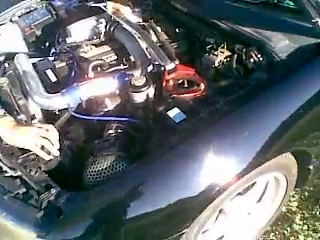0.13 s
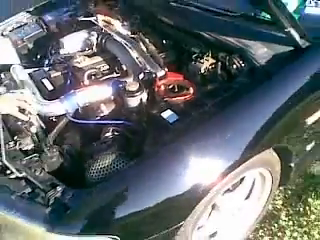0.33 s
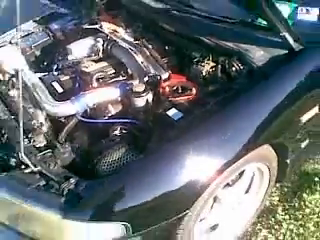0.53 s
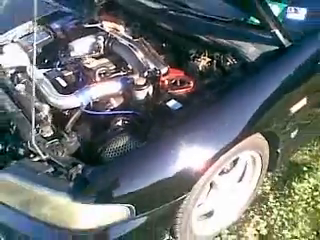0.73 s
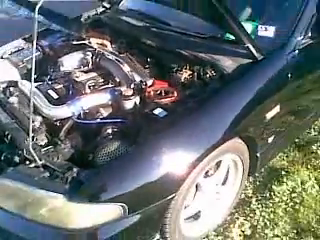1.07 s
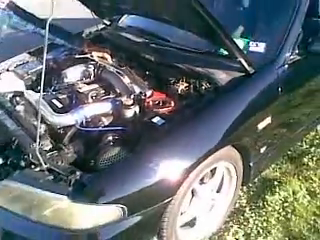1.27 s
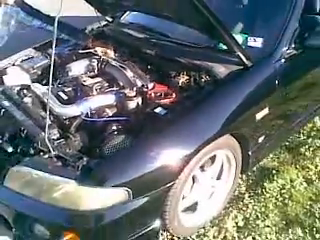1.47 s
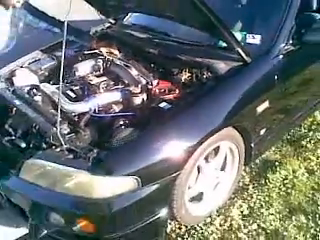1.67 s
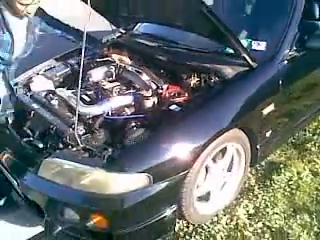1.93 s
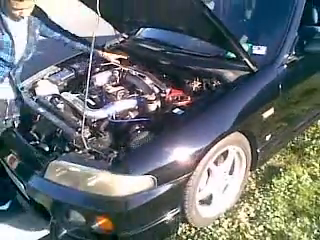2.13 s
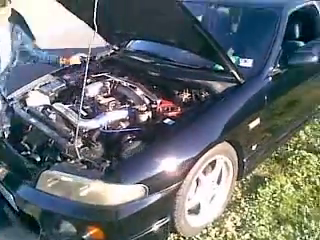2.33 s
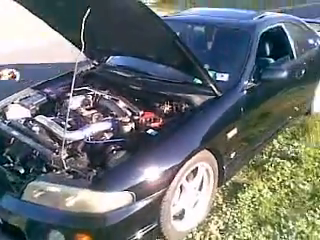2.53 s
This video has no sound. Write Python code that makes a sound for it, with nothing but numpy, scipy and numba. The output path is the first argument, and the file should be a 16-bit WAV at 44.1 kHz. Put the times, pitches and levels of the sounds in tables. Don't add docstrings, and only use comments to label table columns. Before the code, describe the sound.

A six-cylinder turbo engine drops, gets a quick throttle blip, then chuffs in a fading flutter

```python
import sys
import numpy as np
from scipy import signal
from scipy.fft import dct
from scipy.io import wavfile
from scipy.ndimage import uniform_filter1d
from numba import njit

SR = 44100
rng = np.random.default_rng(int(sys.argv[2]) if len(sys.argv) > 2 else 0)


def ratio(d):
    e = np.asarray(d, float) / 20
    return 10 ** e


def transcribe(u):
    v = np.clip(np.atleast_2d(u).T, -1, 1)
    q = np.round(v * 32767).astype(np.int16)
    wavfile.write(sys.argv[1], SR, q)


N = 119511

# time in seconds, firing rate in Hz, level of the firing tone in dB,
# level of the half-rate tone in dB, level of the exhaust overtones in dB.
ENGINE = [(0,154.1,-29,-48,-31.5), (0.06,149.5,-30,-37,-32.5), (0.24,137.3,-21.5,-34.5,-33.5),
          (0.41,126.5,-21.5,-43.5,-35), (0.67,108,-18.5,-42,-39), (0.77,100.6,-20,-30.5,-35.5),
          (0.88,96.86,-22,-35,-37), (1.0,114.5,-17.5,-47,-37), (1.14,142.8,-21,-45,-36),
          (1.23,165.6,-22.5,-61,-39), (1.33,186.9,-23,-36.5,-36), (1.42,203,-17,-63,-31.5),
          (1.49,215.4,-22.5,-32,-51), (1.54,210.1,-27,-29.5,-49), (1.71,197,-24,-27.5,-35.5),
          (2.08,164.1,-27.5,-33,-37), (2.45,136.4,-20,-36,-34), (2.71,118,-24.5,-48,-37.5)]
# multiple of the cycle rate, level in dB re the half-rate tone.
UNEVEN_TONES = [(2, -27.5), (3, -1), (4, -6.5), (5, -14.5)]
# multiple of the cycle rate, level in dB re all overtones.
OVERTONES = [(7, -14), (8, -13), (9, -6), (10, -12), (12, -10), (15, -11), (18, -14), (21, -20)]
# centre in Hz, width in Hz, level in dB.
PIPES = [(202.4, 54, -1.5), (297, 90, -1.5), (367, 130, -2.5)]
# time in seconds, length in seconds, depth in dB.
STUMBLES = [
    (.133, .007, 5),
    (.755, .013, 20),
    (.845, .01, 6),
    (1.243, .011, 11),
    (1.505, .016, 12),
]
# time in seconds, pitch in Hz, level in dB, length in seconds.
THUDS = [(.06, 76, -15.5, 0.011), (0.103, 88, -15.5, 0.01), (0.81, 61.4, -33, 0.01), (1.7, 46, -32, 0.011),
         (1.5, 79.8, -23, .009), (.027, 385, -21.5, 0.0099), (1.548, 335, -25, 0.022),
         (1.1, 310, -29, 0.025), (0.92, 357, -26.5, 0.0077), (0.28, 360, -36, 0.018),
         (0.33, 190, -31, 0.019)]
# time in seconds, pitch in Hz, level in dB, length in seconds.
DUCT_RINGS = [(1.44, 1070, -22, 0.0074), (1.458, 1100, -23.5, 0.008), (1.46, 2150, -24, 0.0057),
              (1.467, 2180, -19, 0.0057), (1.527, 1040, -17, 0.0055), (1.548, 705, -17.5, 0.0079),
              (1.566, 720, -21.5, 0.0096), (1.564, 1200, -24, 0.017), (1.598, 1044, -19, .006),
              (1.2, 1050, -38, 0.015), (.03, 930, -30.5, 0.015), (.035, 790, -30.5, 0.013),
              (.285, 790, -33.5, .02), (1.73, 1700, -28, 0.019)]
# time of the crest in seconds, rise in seconds, fall in seconds,
# multiple of the cycle rate, level in dB.
GROWL = [
    (0.95, 0.08, 0.028, 12, -28.5),
    (1.296, 0.054, 0.044, 9, -33),
    (1.055, 0.055, 0.026, 18, -38),
    (1.055, 0.019, 0.032, 24, -44.5),
    (1.28, 0.047, 0.029, 18, -47.5),
    (1.36, 0.044, 0.03, 12, -31.5),
    (1.133, 0.05, .03, 12, -35),
    (0.78, 0.077, .05, 12, -34),
    (1.11, 0.049, 0.048, 9, -35),
]
# time in seconds, level in dB.
AIRFLOW = [(0, -28.5), (.3, -34.5), (.6, -39), (.87, -43.5), (1.03, -37.5), (1.15, -35.5), (1.3, -30),
           (1.4, -29), (1.6, -22), (1.8, -28.5), (2.1, -33.5), (2.4, -37.5), (2.71, -45)]
# centre in Hz, width in Hz, level in dB.
DUCTS = [(345, 98, -0.5), (671, 52, -2.5), (780.5, 64, -1.5), (865, 58, -3), (1025, 78, 0.5),
         (1253, 110, -3.5), (1418, 100, -1.5), (1666, 100, -5.5), (1862, 170, -0.5), (2181, 110, 1),
         (2410, 130, -4.5), (3017, 350, -6), (3804, 350, -5), (4770, 320, -11.5)]
# time of the crest in seconds, level in dB,
# rise in seconds, fall in seconds, pitch of the ringing duct in Hz.
SURGES = [
    (1.461, -20, 0.035, 0.013, 2220),
    (1.546, -20, 0.0081, 0.036, 710),
    (1.657, -25.5, 0.013, 0.011, 1040),
]
# time of the crest in seconds, level of the jet in dB,
# centre of the jet in Hz, level of the duct roar in dB.
PUFFS = [(0.03, -27, 6220, -30), (0.109, -31, 5640, -30), (0.187, -31.5, 5290, -35),
         (0.263, -34, 5740, -34.5), (0.341, -35.5, 5380, -34.5), (0.421, -37.5, 5680, -34),
         (0.496, -39, 6130, -34), (0.565, -42, 6140, -36), (0.641, -44, 6300, -39),
         (1.413, -27, 5330, -26.5), (1.469, -25, 5880, -17), (1.533, -25, 5500, -19),
         (1.646, -35, 6580, -41), (1.684, -29, 7050, -46), (1.755, -28, 7860, -25),
         (1.845, -25, 7410, -27.5), (1.931, -25, 6900, -31.5), (2.015, -26, 5740, -31),
         (2.094, -31.5, 5260, -36), (2.171, -31, 5190, -35), (2.246, -32, 5160, -47),
         (2.324, -34, 5050, -37.5), (2.402, -35.5, 5070, -38), (2.474, -39, 5120, -40.5),
         (2.555, -40, 5320, -39), (2.629, -41, 5200, -40.5), (2.71, -40.5, 5270, -38.5)]
# time in seconds, level in dB.
BOOST = [(0, -52.5), (.4, -47), (.75, -58.5), (.95, -54.5), (1.12, -48.5), (1.3, -33.5), (1.45, -31.5),
         (1.62, -30), (1.82, -42.5), (2.2, -52), (2.71, -51.5)]
# time in seconds, level in dB.
SNAPS = [
    (0.018, -38),
    (1.828, -28.5),
    (2.001, -38),
]
# frequency in Hz, level in dB per Hz.
BAY = [(15, -47), (25, -18), (102, -11), (213, -5.5), (530, -44.5), (767, -33.5), (2270, -23.5),
       (7210, -49), (9000, -108), (11700, -138), (19800, -120)]
# centre in Hz, width in Hz, share cancelled (0 to 1).
ECHO_VALLEYS = [(529, 170, 0.42), (1442, 160, 0.27), (3236, 590, 0.14), (4386, 150, 0.69), (5440, 89, 0.88),
                (6690, 190, 0.37)]
# frequency in Hz, step in dB re the neighbouring level,
# smallest step in dB.
STEPS = [(100, -28, -80), (2300, -8, -70), (3200, 2, -60), (4200, 7, -56), (7800, 8, -51), (8200, 12, -45),
         (8900, 13, -41), (10000, 14.5, -36)]
# time in seconds, length in seconds.
COARSER_MOMENTS = [
    (1.87, .025),
    (1.96, .035),
    (2.03, .012),
]


def level(x, db):
    return x * ratio(db) / np.sqrt(np.mean(x ** 2))


def noise():
    return rng.standard_normal(N)


@njit
def moving_band(x, hz, width):
    y, band_state, low_state = np.empty(len(x)), 0., 0.
    for i in range(len(x)):
        g, damping = np.tan(np.pi * hz[i] / SR), width / hz[i]
        v = (band_state + g * (x[i] - low_state)) / (1 + g * (g + damping))
        band_state, low_state = 2 * v - band_state, low_state + 2 * g * v
        y[i] = damping * v
    return y


def band(x, hz, width_hz):
    return moving_band(x, hz * np.ones(N), 1. * width_hz)


def walk(rate_hz):
    hold = int(SR / rate_hz)
    held = np.repeat(rng.standard_normal(N // hold + 1), hold)
    return 1.73 * uniform_filter1d(uniform_filter1d(held, hold), hold)[:N]


def curve(table, axis):
    rows = np.array(table, float)
    return np.interp(np.arange(N) / SR, rows[:, 0], rows[:, axis])


def bump(at, rise, fall):
    d = np.arange(N) / SR - at
    return np.exp(-.5 * (d / np.where(d < 0, rise, fall)) ** 2)


def tones(cycle, orders, wobble_db, drift):
    total = 0
    for multiple, db in orders:
        loudness = ratio(db + wobble_db * walk(14)) * np.sqrt(2)
        phase = multiple * cycle + drift * walk(11) + rng.random()
        total = total + loudness * np.sin(2 * np.pi * phase)
    return total


def firing(cycle):
    stumble = ratio(-sum(db * bump(s, w, w) for s, w, db in STUMBLES))
    main = ratio(curve(ENGINE, axis=2)) * stumble * tones(cycle, [(6, 0.0053)], 1.0, 0.052)
    return main + ratio(curve(ENGINE, axis=3)) * tones(cycle, UNEVEN_TONES, 0.34, 0.17)


def exhaust(cycle):
    rumble = level(band(band(noise(), 340, 170), 340, 200), -7)
    rumble = rumble * (1 + .5 * np.sin(12 * np.pi * cycle))
    pulses = tones(cycle, OVERTONES, 2.96, 0.094)
    piped = sum(ratio(db) * band(pulses, hz, w) for hz, w, db in PIPES)
    return ratio(curve(ENGINE, axis=4)) * (piped + rumble)


def thuds():
    t = np.arange(N) / SR
    return sum(ratio(db) * bump(s, w, w) * np.cos(2 * np.pi * hz * (t - s))
               for s, hz, db, w in [*THUDS, *DUCT_RINGS])


def intake(cycle):
    gate = (1 + .2 * np.sin(12 * np.pi * cycle)) * ratio(0.57 * walk(25.13))
    ticks = np.diff(np.floor(12 * cycle), prepend=0) * ratio(4.0 * noise())
    air = gate * noise() + level(ticks, -9.5)
    ducts = 0
    for k, (hz, w, db) in enumerate(DUCTS):
        sign = (-1) ** k
        ducts = ducts + sign * ratio(db + 1.2 * walk(10)) * band(air, hz, w) / np.sqrt(w)
    power = ratio(curve(AIRFLOW, axis=1)) ** 2
    for s, _, _, db in PUFFS:
        power = power + (ratio(db) * bump(s, 0.015, 0.022)) ** 2
    for s, db, rise, fall, _ in SURGES:
        power = power + (ratio(db) * bump(s, rise, fall)) ** 2
    rings = sum(ratio(db) * bump(s, rise, fall) * level(band(noise(), hz, 89), -20.5)
                for s, db, rise, fall, hz in SURGES)
    return level(ducts, 0) * np.sqrt(power) + rings


def hiss_band(hz, width_hz):
    return level(band(band(noise(), hz, width_hz), hz, 1.1 * width_hz), 0)


def even(x):
    power = abs(uniform_filter1d(x ** 2, size=int(.006 * SR)))
    return x / np.sqrt(power + .05)


def surge_jets():
    puffs = sum(ratio(db) * bump(s, 0.0099, 0.013) for s, db, _, _ in PUFFS)
    jet = hiss_band(curve(PUFFS, axis=2), 2000)
    jet = jet + ratio(-5.5) * hiss_band(7350, 1900) + ratio(-9) * hiss_band(4900, 1500)
    snaps = sum(ratio(db) * bump(s, .001, .012) for s, db in SNAPS) * even(hiss_band(7700, 2200))
    return puffs * ratio(.8 * walk(120)) * even(jet) + snaps


def bay():
    hzs, dbs = np.array(BAY, float).T
    total = 0
    for hz in 28 * 2 ** np.arange(0, 8.3, .5):
        db = np.interp(np.log(hz), np.log(hzs), dbs) + 1.2 * walk(13)
        total = total + ratio(db) * band(band(noise(), hz, hz / 2), hz, hz / 2)
    return level(total, -36.5)


def growl(cycle):
    return sum(bump(s, rise, fall) * tones(cycle, [(round(k), db)], 1.3, 0.08)
               for s, rise, fall, k, db in GROWL)


def boost():
    hiss = hiss_band(5200, 4600) + ratio(-8.0) * hiss_band(7200, 1300)
    return ratio(curve(BOOST, axis=1) + 1.8 * walk(17)) * hiss


def scene():
    cycle = np.cumsum(curve(ENGINE, axis=1)) / SR / 6
    air = intake(cycle) + surge_jets() + bay() + boost()
    for hz, w, share in ECHO_VALLEYS:
        air = air - share * band(air, hz, w)
    return (firing(cycle) + exhaust(cycle) + thuds() + growl(cycle) + air)[None]


def round_faint_detail(x):
    frame, start = 1024, 600
    padded = np.concatenate([np.zeros(2 * frame - start), x, np.zeros(2 * frame)])
    rows = padded[:len(padded) // frame * frame].reshape(-1, frame)
    window = np.sin(np.pi * (np.arange(2 * frame) + .5) / (2 * frame))
    a, b, c, d = np.split(np.hstack([rows[:-1], rows[1:]]) * window, 4, axis=1)
    z = dct(np.hstack([-c[:, ::-1] - d, a - b[:, ::-1]]), type=4, norm="ortho")

    near = np.sqrt(abs(uniform_filter1d(z ** 2, size=70, axis=1)))
    hz = (np.arange(frame) + .5) * SR / 2 / frame
    step_hz, step_db, least_db = np.array(STEPS, float).T
    step = np.maximum(near * ratio(np.interp(hz, step_hz, step_db)), ratio(np.interp(hz, step_hz, least_db)))
    scatter = uniform_filter1d(rng.standard_normal((len(z), frame // 8)), size=3, axis=0) * np.sqrt(3)
    step = step * ratio(3.5 * np.repeat(scatter, 8, axis=1))
    times = np.clip(np.arange(len(z)) * frame - frame + start, 0, N - 1)
    coarser = sum(bump(s, w, w) for s, w in COARSER_MOMENTS)[times]
    step = step * ratio(4 * np.outer(coarser, (hz > 3000) & (hz < 7000)))
    rounded = step * np.sign(z) * np.floor(abs(z) / step + .4)

    u, v = np.split(dct(rounded, type=4, norm="ortho"), 2, axis=1)
    y = np.hstack([v, -v[:, ::-1], -u[:, ::-1], -u]) * window
    return (y[1:, :frame] + y[:-1, frame:]).ravel()[frame - start:][:N]


def low_pass(x):
    return signal.sosfilt(signal.butter(12, 10080, fs=SR, output="sos"), x)


def record(dry):
    x = signal.sosfilt(signal.ellip(8, .2, 70, 9800, fs=SR, output="sos"), dry[0])
    x = x - 0.28 * band(x, 9560, 2000)
    at_snap = sum(bump(s, .008, .008) for s, _ in SNAPS)
    dull = signal.sosfiltfilt(signal.butter(6, 8300, fs=SR, output="sos"), x)
    mix = at_snap * dull + (1 - at_snap) * round_faint_detail(x)
    return low_pass(mix[None])


dry = scene()
out = record(dry)
transcribe(out)
```